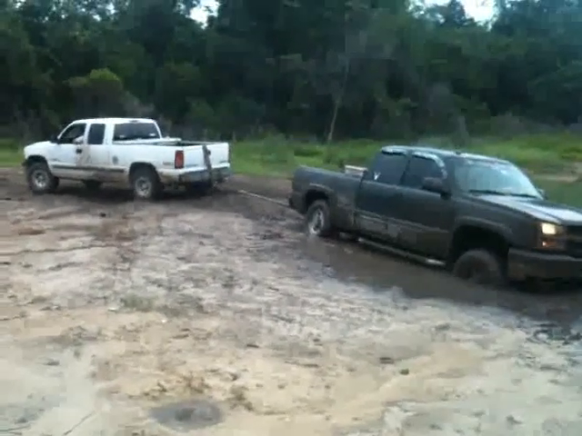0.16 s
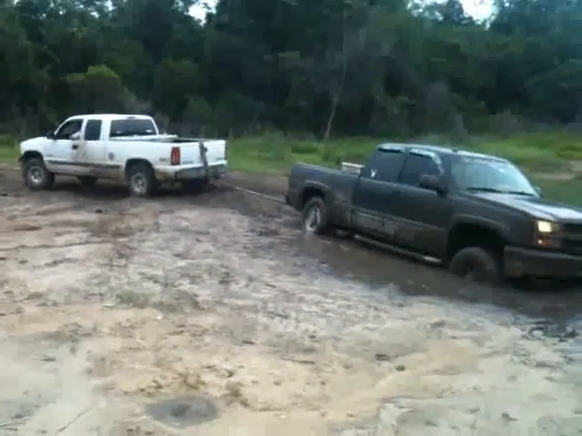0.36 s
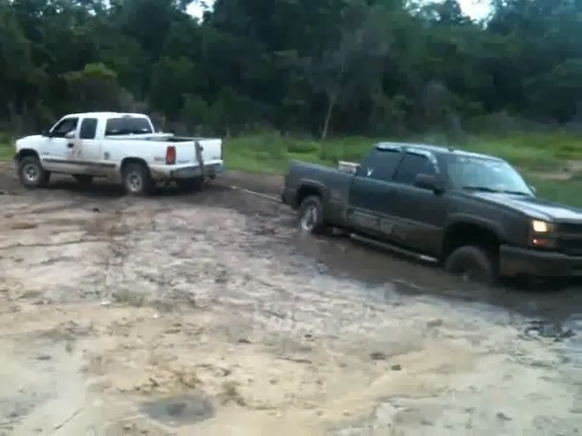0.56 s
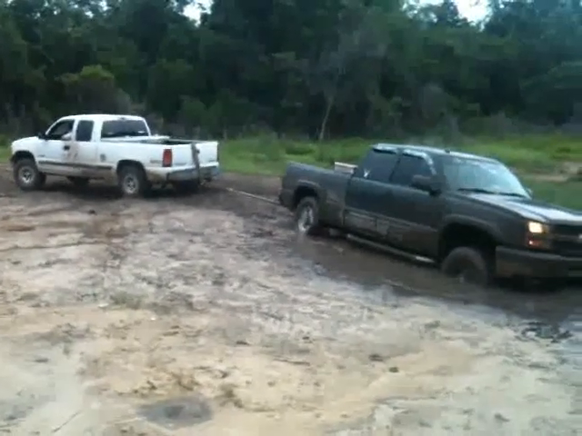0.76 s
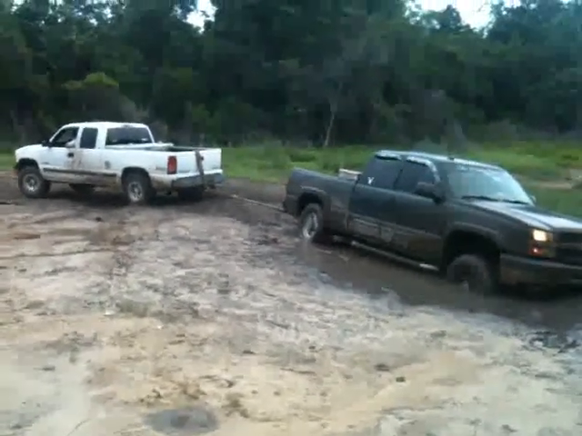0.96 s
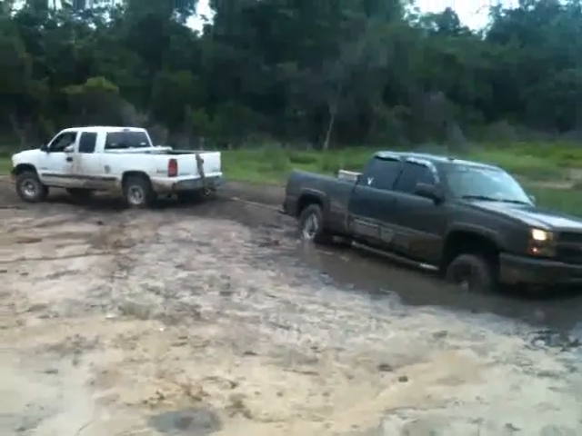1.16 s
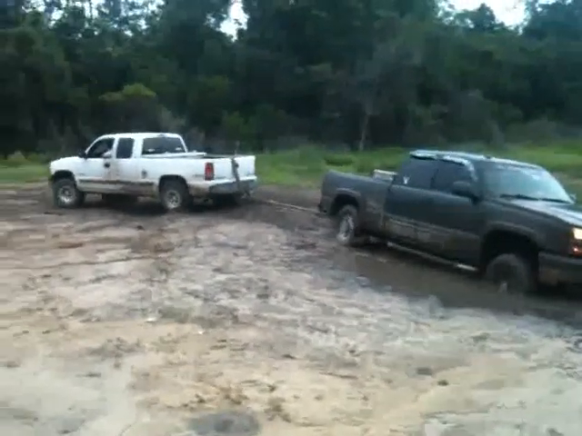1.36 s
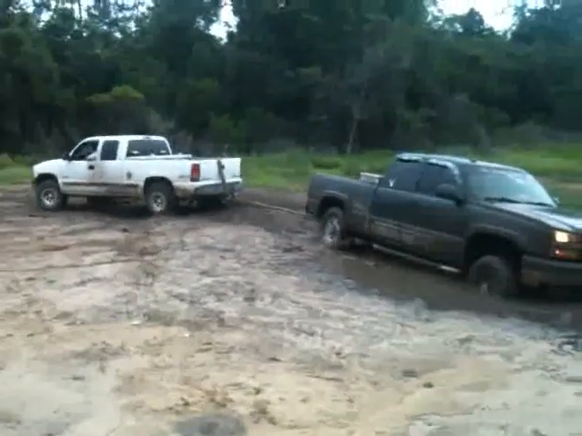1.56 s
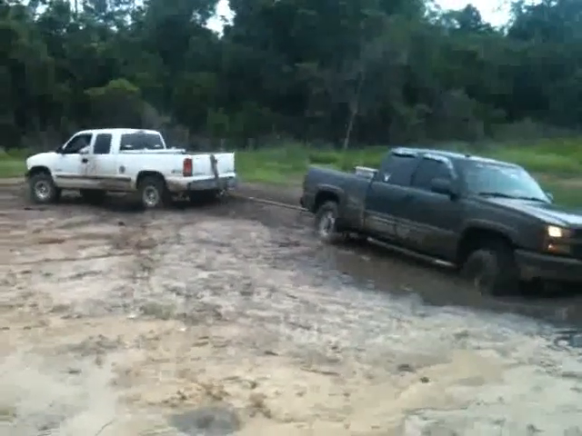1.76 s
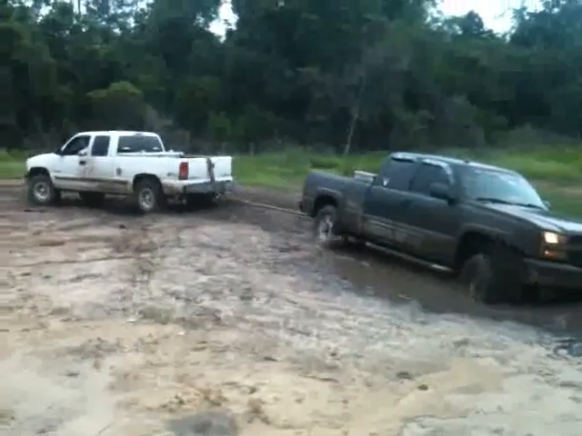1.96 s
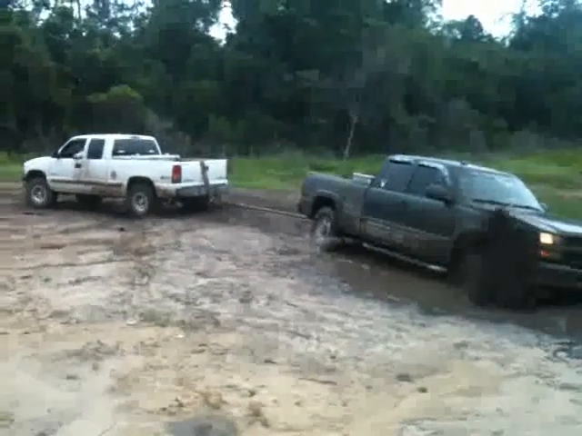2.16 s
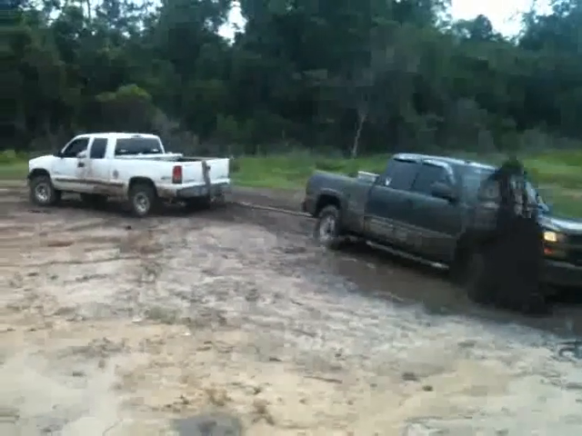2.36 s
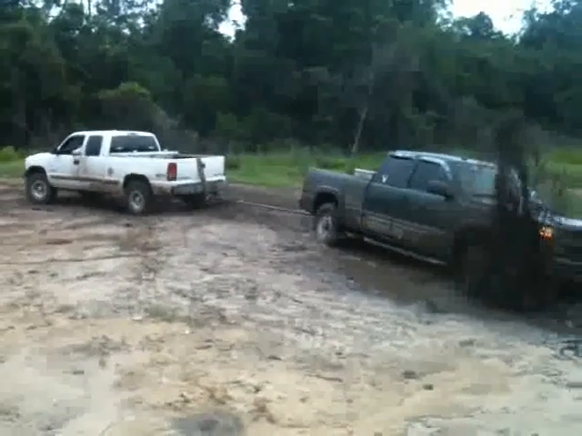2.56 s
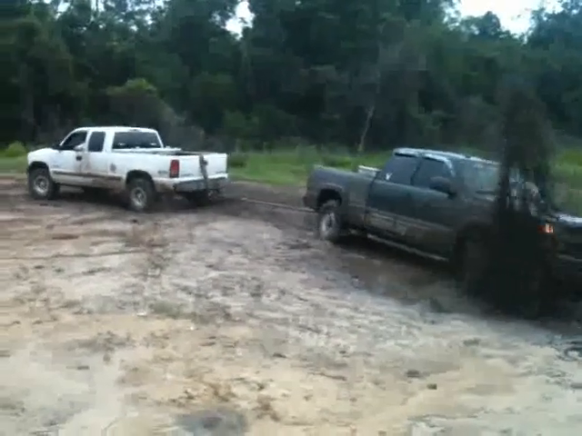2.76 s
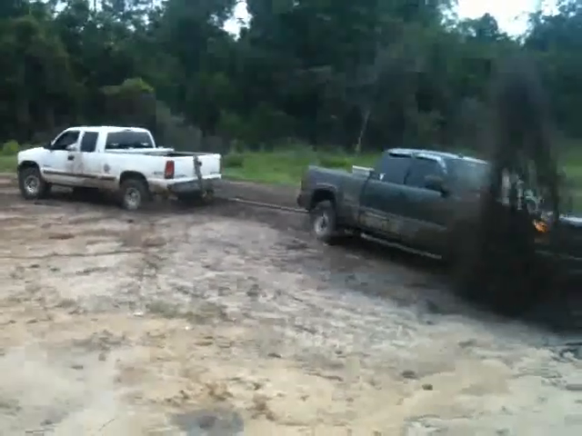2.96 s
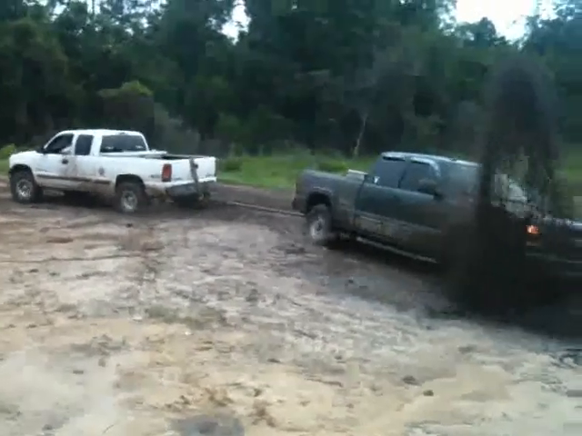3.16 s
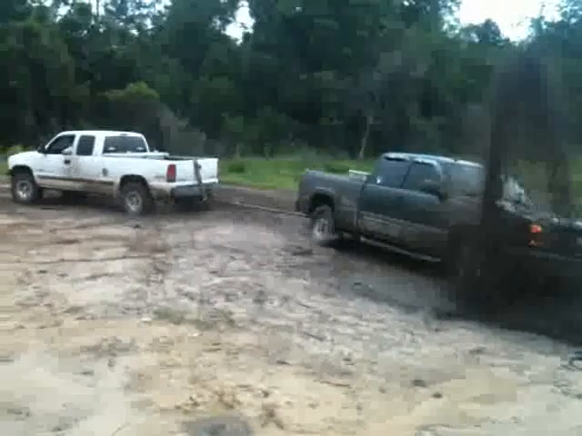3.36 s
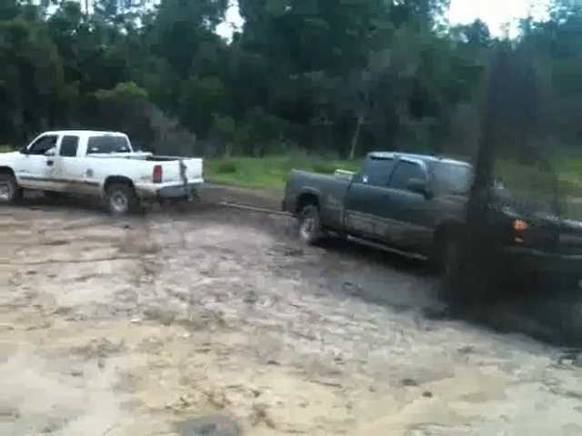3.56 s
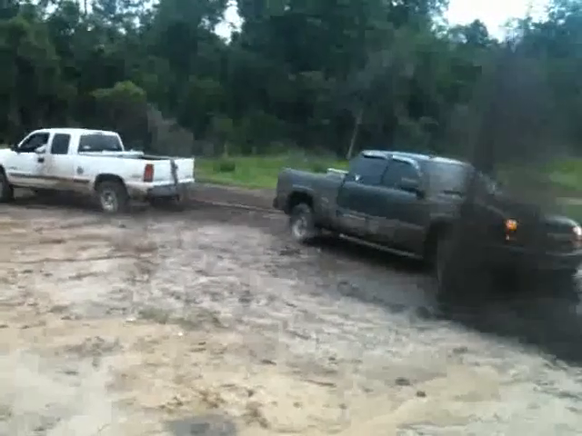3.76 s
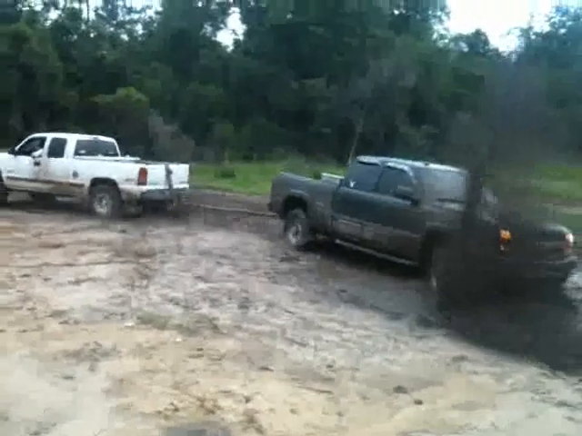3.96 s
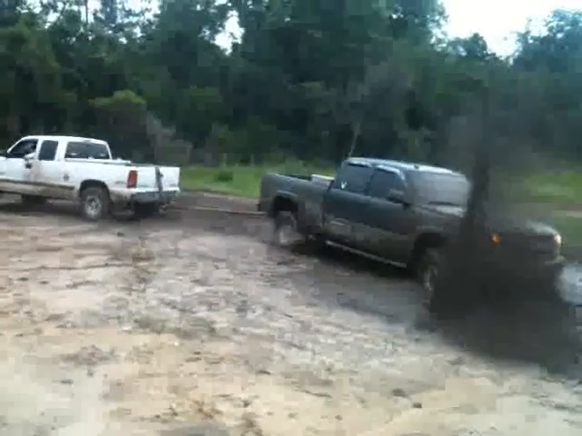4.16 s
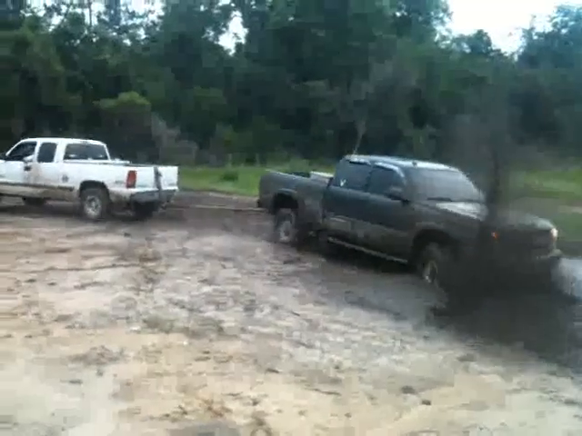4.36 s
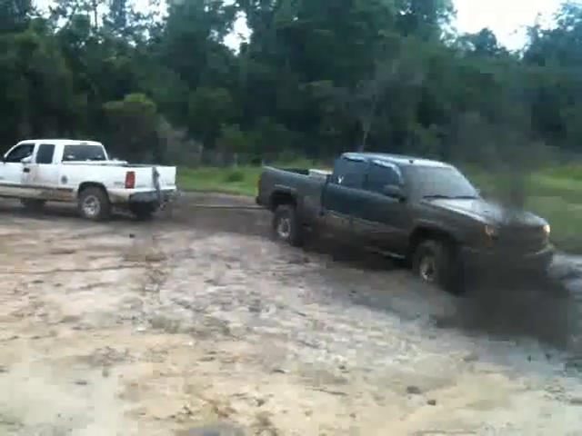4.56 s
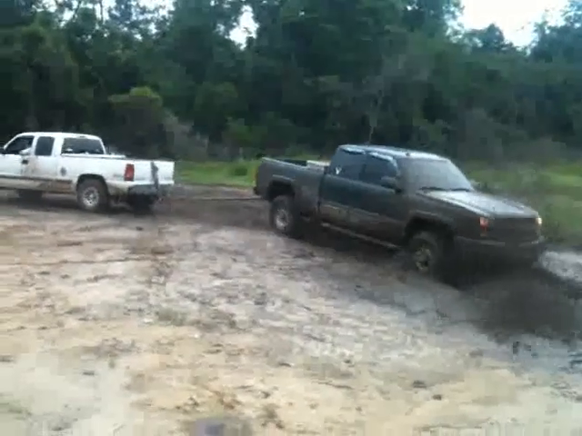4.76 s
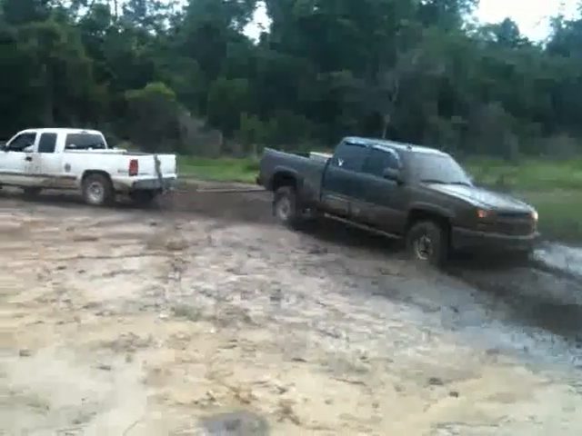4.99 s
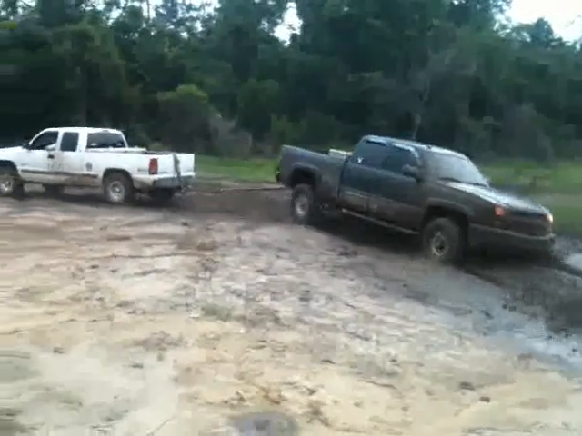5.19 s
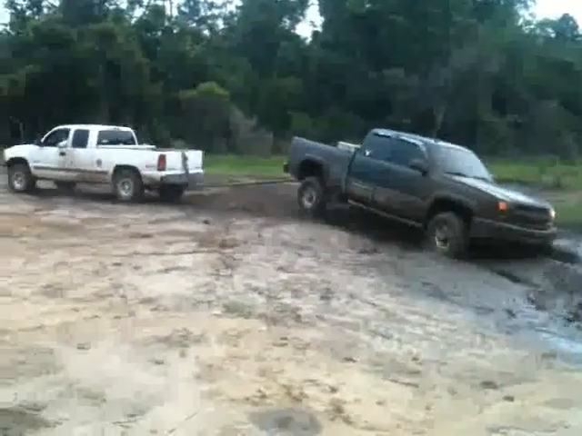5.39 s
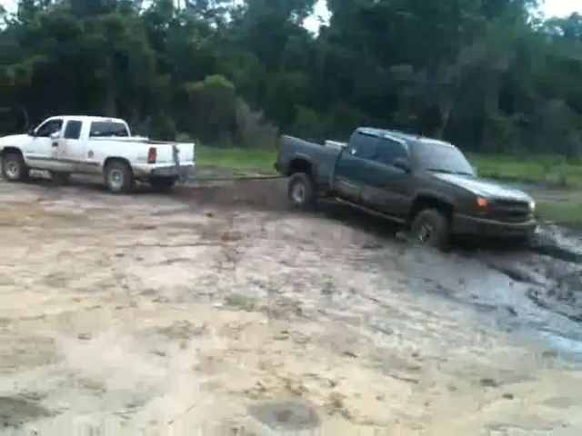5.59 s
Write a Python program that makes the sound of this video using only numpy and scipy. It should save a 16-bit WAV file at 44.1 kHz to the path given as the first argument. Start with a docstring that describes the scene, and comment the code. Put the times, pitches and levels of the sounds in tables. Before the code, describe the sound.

Two V8 pickups rumble low, then one pulls hard with sharp exhaust cracks while the other revs in raspy bursts, tyres spraying mud.

```python
"""Two V8 pickups at a mud hole, heard from the bank: at first both work lightly over still air.
The towing truck takes up the rope and pulls harder; loose metal rattles on it and exhaust cracks ring out.
The stuck truck joins in, its tyres throw a spray of mud, and it revs in bursts as the tow eases off.
Sine orders make each drone; uneven firing pulses make rumble, rasp and spitting gas in the pipes.
Filtered noise makes air and mud; the tree line echoes the exhausts faintly."""
import sys
import numpy as np
from scipy import signal
from scipy.fft import rfft, irfft
from scipy.io import wavfile
from scipy.ndimage import uniform_filter1d

SR = 44100
rng = np.random.default_rng(int(sys.argv[2]) if len(sys.argv) > 2 else 0)


def unload_audio(sound):
    """Save the sound as a 16-bit wav file, at the path given as the first command line argument."""
    columns = np.transpose(np.atleast_2d(sound))
    # keep every value between -1 and 1, then stretch to whole-number steps
    steps = np.round(np.clip(columns, -1, 1) * 32767)
    wavfile.write(sys.argv[1], SR, steps.astype(np.int16))


N = 248283  # samples

# Still air of the clearing. Each row: frequency in Hz, relative level in dB per Hz.
AIR_COLOUR = [(290, -68), (500, -9), (696, -4), (792, -2), (1430, -13.5), (1770, -14.5), (3430, -16.5),
              (12700, -18), (15500, -15)]
AIR_DB = -71
# Mud thrown by the spinning tyres. Each row: time in seconds, level in dB.
SPRAY_LEVEL = [(0, -77), (1.0, -78), (1.9, -62.5), (2.5, -60.5), (3.45, -59), (4.3, -59.5), (4.8, -63.5),
               (5.63, -71)]

# Thin metal rattle while the towing truck pulls.
RATTLE_START_S, RATTLE_HELD_S, RATTLE_DB = 0.88, 1.77, -70
RATTLE_ATTACK_S, RATTLE_RELEASE_S = 1, 0.19
# Its clearest ticks. Each row: time in seconds, starting level of the ring in dB, ring in Hz.
RATTLE_TICKS = [(1.2405, -63, 3250), (1.387, -63, 3620), (1.5413, -60, 3430), (1.7713, -56, 3470),
                (1.8237, -59, 3330), (1.8396, -55, 4200), (1.924, -58, 3920)]
TICK_RING_S, TICK_CONTACT_S, TICK_CONTACT_DB = 0.0036, 0.001, -2  # contact noise in dB re the ring

# Exhaust cracks. Each row: time in seconds, relative level in dB of snap, pipe pop, thud and high zing.
EXHAUST_CRACKS = [(1.240, -60, -39, -75, -81), (1.272, -47, -38.5, -74, -75),
                  (1.9726, -37, -30, -54.5, -65), (2.0213, -23.5, -25, -35, -42),
                  (2.0684, -22, -26, -36, -23.5), (2.242, -28.5, -35, -58, -62),
                  (3.727, -34, -27, -59, -65), (4.961, -53, -46, -66, -75)]
# Colour of the snap. Each row: frequency in Hz, relative level in dB per Hz.
SNAP_COLOUR = [(300, -1), (900, -17), (2000, -15), (4000, -4), (6000, -15.5), (10000, -9), (16000, -23)]

# Pipe under the rumble, tailpipe rasp (also the pop of a crack), and spitting gas (also the mud).
# Each row: frequency in Hz, relative level in dB per Hz.
PIPE_COLOUR = [(40, -27), (75, -19.5), (105, -3), (135, -4), (160, -5), (200, 1.5), (250, -2.5),
               (300, -3.5), (360, -3.5), (450, -16.5), (560, -26), (900, -73)]
RASP_COLOUR = [(300, -6), (480, 1.5), (570, -3), (660, 2.5), (745, 3), (805, 4), (870, 2), (1100, -2),
               (1230, -12), (1380, -19.5), (1600, -22), (1850, -15), (2300, -31), (4000, -26.5),
               (6000, -43.5)]
GAS_COLOUR = [(880, -40), (1500, -4), (1860, -4), (2330, -8.5), (2680, -7.5), (2930, -12.5), (3230, -6),
              (3740, -12.5), (4210, -8), (5880, -13.5), (6950, -9), (7970, -12), (10100, -11.5),
              (11400, -9), (15700, -7.5)]

# Engine orders before throttle and boom. Each row: multiple of the cycle rate, relative level in dB.
STUCK_TONES = [(3, -28.5), (4, -37.5), (5, -26.5), (6, -45.5), (7, -42), (8, -32.5), (9, -48), (10, -46),
               (11, -41.5), (12, -41.5), (13, -60), (19, -43), (20, -39), (21, -42), (23, -48.5),
               (24, -43.5), (25, -49.5), (27, -58), (29, -48), (32, -53.5)]
TOW_TONES = [(4, -52), (5, -31.5), (7, -37.5), (8, -36.5), (9, -27), (10, -42.5), (11, -36.5), (13, -43),
             (14, -33)]
# Exhaust resonances; an order booms as it glides through. Each row: frequency in Hz, gain in dB.
STUCK_RESONANCES = [(75, -35), (105, -13), (143, -11), (160, -6.5), (185, -2.5), (210, -3), (232, 0.5),
                    (295, 1.5), (330, -0.5), (370, 3), (410, -1), (450, 1), (510, -17.5), (620, -21),
                    (740, -6), (805, -16), (870, -10), (1000, -13), (1180, -14), (1300, -28)]
TOW_RESONANCES = [(60, -20), (108, -27), (124, -1.5), (150, -0.5), (172, -10.5), (190, 4.5), (230, 4),
                  (260, -6), (290, -23.5), (320, -10), (355, -4), (410, -14.5)]
# The eight firings of a cycle.
# Each row: relative strength in dB, delay through manifold and pipe in seconds.
STUCK_FIRINGS = [(1.5, 0.00047), (-11, 0.000036), (-7, 0.00211), (-4, 0.00022), (-13, 0.00083),
                 (-8.5, 0.00012), (-5, 0.00092), (-14.5, 0.0004)]
TOW_FIRINGS = [(1, 0.001136), (-8.5, 0.0015), (-7.5, 0.001575), (-5.5, 0.00055), (-6.5, 0.00197),
               (-2, 0.001856), (-2.5, 0.001), (-4, 0.00191)]

# Engine speed: the tow is one long pull that eases off; the stuck wheels slip and grip.
# Each row: time in seconds, engine cycles in Hz.
TOW_CYCLES = [(0, 12.75), (.8, 13.4), (1.1, 14.4), (1.55, 17.08), (1.8, 19.09), (2.05, 21.14),
              (2.35, 25.58), (2.6, 28.8), (2.86, 32.27), (3.03, 32.68), (3.14, 30.69), (3.25, 27.38),
              (3.5, 23.5), (3.8, 20.6), (3.95, 17.7), (4.6, 17), (5.05, 21.1), (5.63, 21.5)]
STUCK_CYCLES = [(0, 21.86), (.7, 23.7), (1.3, 26.92), (1.9, 28.26), (2.3, 26.97), (2.55, 25.47),
                (2.7, 28.18), (2.84, 30.09), (3.0, 28.85), (3.12, 30.71), (3.45, 36.2), (3.58, 37.7),
                (3.78, 34.46), (3.95, 36.53), (4.07, 37.39), (4.21, 36.19), (4.38, 39.01), (4.5, 38.98),
                (4.57, 34.71), (4.7, 33.4), (4.82, 27.48), (4.93, 27.14), (5.1, 29.28), (5.35, 24.71),
                (5.63, 21.5)]
# Effort of the tow, and of the stuck engine between stabs.
# Each row: time in seconds, effort in dB re full throttle.
TOW_THROTTLE = [(0, -60), (.7, -31), (1.12, -23.5), (1.25, -13.5), (1.7, -9), (1.91, -6.5), (2.0, -3),
                (2.3, 0.5), (2.48, -4), (2.8, -1.5), (2.92, -8), (3.4, -1), (3.72, -6), (4.0, -12),
                (4.8, -15.5), (5.25, -16), (5.45, -20.5), (5.63, -29)]
STUCK_PART_THROTTLE = [(0, -56), (1.1, -46), (2.3, -8.5), (2.9, -11), (3.7, -18), (4.15, -13), (4.45, -29),
                       (4.54, -25), (4.85, -27), (5.63, -38.5)]
# Stabs of the stuck truck's pedal.
# Each row: start in seconds, time to the release in seconds, effort in dB re full throttle.
PEDAL_STABS = [(2.54, 0.29, -3.5), (2.992, .57, -2.5), (3.77, 0.27, -2.5), (4.208, 0.2, -0.5),
               (4.599, 0.095, -12.5), (4.93, .13, -7.5)]
PEDAL_ATTACK_S, PEDAL_RELEASE_S = 0.045, 0.024
# Drive of the low drone. Each row: time in seconds, relative level in dB.
TOW_DRONE_LEVEL = [(0, -29.5), (.35, -23), (.7, -16.5), (1.1, -21.5), (1.25, -14.5), (1.7, -8), (1.9, -4),
                   (2.0, -3), (2.3, -3), (2.5, -6.5), (2.8, 0), (3.03, 6), (3.2, -6.5), (3.4, -7),
                   (3.72, -4.5), (4.0, -16.5), (4.8, -26), (5.15, -14), (5.45, -15.5), (5.63, -26)]
STUCK_DRONE_LEVEL = [(0, -24.5), (1.1, -36), (1.3, -19.5), (2.0, -4.5), (2.3, -3), (2.7, 2.5), (2.9, 0),
                     (3.2, -3.5), (3.55, 0), (3.7, -10.5), (3.85, -0.5), (4.05, 0), (4.17, -5), (4.3, 2),
                     (4.43, 0), (4.55, -10), (4.7, -5), (4.79, -13.5), (5.02, 0), (5.2, -11), (5.63, -15)]
# Growth with effort, one row each for rumble, rasp and gas.
# Each row: level at zero dB of effort in dB, growth in dB per dB of effort.
TOW_EXHAUST_GROWTH = [(-35.5, .44), (-43.5, 1.07), (-58, 5)]
STUCK_EXHAUST_GROWTH = [(-33, 0.38), (-42, 1), (-60, 1)]

# From the first to the second frequency in Hz the tones pass from drone level to throttle.
GROWL_RANGE_HZ = [310, 420]
GROWL_GROWTH = 0.64  # dB per dB of effort
FLUTTER_PER_S = 16  # each tone flutters a little in level
GAS_DB_PER_HZ, GAS_REF_HZ = 0.5, 27.3  # a faster engine spits more gas
SPIT_POWER = 1.24  # the strongest firings spit the most
LIGHT_THROTTLE_DB = -29.5  # effort at which the firings lose their edge
EVEN_FIRING_DB = -8.5  # effort above which the rumble stops growing
IDLE_WOBBLE_TURNS, IDLE_WOBBLE_PER_S = 0.005, 9  # the crank runs early and late on a light throttle


def undb(db):
    """Decibels to gain."""
    return np.exp(np.asarray(db) * (np.log(10) / 20))


def unit(x):
    """Scale to rms 1."""
    return x / np.sqrt(np.mean(x ** 2))


def curves(table):
    """The columns of a table after its times, sample by sample."""
    s, *columns = np.transpose(table)
    return [np.interp(np.arange(N) / SR, s, column) for column in columns]


def walk(rate):
    """Random levels held 1 / rate seconds, smoothed twice, at rms 1."""
    held = int(SR / rate)
    steps = np.repeat(rng.standard_normal(N // held + 1), held)
    smooth = uniform_filter1d(uniform_filter1d(steps, held), held)
    return unit(smooth[:N])


def colour(x, points, size=8192):
    """Minimum-phase filter through (Hz, dB) points: a pulse rings only after it strikes."""
    hz, db = np.transpose(points)
    bins = np.maximum(np.fft.rfftfreq(size, 1 / SR), 1)
    gain = undb(np.interp(np.log(bins), np.log(hz), db))
    # folding the cepstrum forward makes the filter causal
    cepstrum = irfft(np.log(gain))
    cepstrum[1:size // 2] *= 2
    cepstrum[size // 2 + 1:] = 0
    response = irfft(np.exp(rfft(cepstrum)))
    return signal.fftconvolve(x, response)[:N]


def band(x, lo_hz, hi_hz):
    """Band-pass between two frequencies."""
    sos = signal.butter(2, np.sort([lo_hz, hi_hz]), "band", fs=SR, output="sos")
    return signal.sosfilt(sos, x)


def fade(x, seconds):
    """Give every pulse an exponential tail."""
    return signal.lfilter([1], [1, -np.exp(-1 / (SR * seconds))], x)


def puffs(pulses, seconds):
    """A decaying burst of turbulent noise after each pulse."""
    return unit(fade(pulses, seconds) * rng.standard_normal(N))


def swell(start_s, held_s, attack_s, release_s):
    """An envelope that rises, holds until held_s after its start and dies away."""
    t = np.arange(N) / SR - start_s
    return np.clip(t / attack_s, 0, 1) * np.exp(-np.maximum(t - held_s, 0) / release_s)


def still_air():
    """The clearing behind the trucks: steady coloured noise."""
    return unit(colour(rng.standard_normal(N), AIR_COLOUR)) * undb(AIR_DB)


def scattered_echoes(x, t60_s, wet_db):
    """Many dull reflections in a decaying noise tail, as from the tree line or inside a silencer."""
    t = np.arange(SR // 2) / SR
    tail = rng.standard_normal(len(t)) * undb(-60 * t / t60_s) * (t > 0.012)
    dull = signal.butter(1, [400, 4000], "band", fs=SR, output="sos")
    tail = signal.sosfilt(dull, tail / np.linalg.norm(tail))
    return x + undb(wet_db) * signal.fftconvolve(x, tail)[:N]


def mud_spray(drops_per_s, spread_db):
    """Thrown mud lands as dense small splats: random drops of uneven size, each a burst of noise."""
    size_db = spread_db * np.minimum(rng.exponential(size=N), 5)
    drops = (rng.random(N) < drops_per_s / SR) * undb(size_db)
    splats = unit(colour(puffs(drops, seconds=0.017), GAS_COLOUR))
    return splats * undb(curves(SPRAY_LEVEL)[0])


def rattle(pulses):
    """Loose metal on the towing truck buzzes with the firings and now and then ticks clearly."""
    envelope = swell(RATTLE_START_S, RATTLE_HELD_S, RATTLE_ATTACK_S, RATTLE_RELEASE_S)
    buzz = unit(band(puffs(pulses, seconds=0.0031), 3300, 4140))
    out = buzz * envelope * undb(RATTLE_DB)
    t = np.arange(SR // 30) / SR
    for s, db, hz in RATTLE_TICKS:
        ring = np.sin(2 * np.pi * hz * t) * np.exp(-t / TICK_RING_S)
        contact = undb(TICK_CONTACT_DB) * rng.standard_normal(len(t)) * np.exp(-t / TICK_CONTACT_S)
        out[int(s * SR):][:len(t)] += undb(db) * (ring + contact)
    return out


def snap_burst(seconds):
    """A brief burst of gas with its spectrum flattened, so that it is about equal at every frequency."""
    t = np.arange(SR // 50) / SR
    spectrum = rfft(rng.standard_normal(len(t)) * np.exp(-t / seconds))
    return irfft(spectrum / np.abs(spectrum))[:len(t) // 2]


def exhaust_cracks():
    """Sharp reports of the exhaust: a snap of gas, a pop in the pipe, a low thud and a high zing."""
    strikes = np.zeros((4, N))
    for s, *levels_db in EXHAUST_CRACKS:
        strikes[:, int(s * SR)] = undb(levels_db)
    snap, pop, thud, zing = strikes
    snap = colour(signal.fftconvolve(snap, snap_burst(seconds=0.003))[:N], SNAP_COLOUR)
    pop = colour(pop, RASP_COLOUR)
    thud = band(fade(thud, seconds=0.0034), 27, 106)
    zing = band(fade(zing, seconds=0.0016) * rng.standard_normal(N), 13300, 14700)
    return undb(12.5) * snap + undb(25) * pop + undb(5) * thud + zing


def pedal():
    """Effort of the stuck engine in dB: stabs of the pedal on top of a part throttle."""
    effort = undb(curves(STUCK_PART_THROTTLE)[0])
    for s, held_s, db in PEDAL_STABS:
        effort = effort + undb(db) * swell(s, held_s, PEDAL_ATTACK_S, PEDAL_RELEASE_S)
    return 20 * np.log10(effort)


def drone(turns, hz, drone_db, effort_db, orders, boom, flutter_db):
    """Tones at multiples of the cycle rate: uneven banks give odd orders, high ones growl under load."""
    boom_hz, boom_db = np.transpose(boom)
    out = 0
    for multiple, db in orders:
        order = round(multiple)
        growl = np.interp(order * hz, GROWL_RANGE_HZ, [0, 1])
        drive_db = (1 - growl) * drone_db + growl * GROWL_GROWTH * effort_db
        resonance_db = np.interp(order * hz, boom_hz, boom_db)
        level_db = db + drive_db + resonance_db + flutter_db * walk(FLUTTER_PER_S)
        lag = order ** 2 / 10  # the pipe delays each order differently, which rounds the wave
        out = out - undb(level_db) * np.sin(2 * np.pi * order * turns + lag)
    return np.sqrt(2) * out


def firings(turns, cylinders, scatter_db, jitter_s):
    """Eight pulses a cycle at even power: their full strength, and their departure from the average."""
    count = len(cylinders)
    number = np.floor(count * turns).astype(int)
    at = np.flatnonzero(np.diff(number)) + 1
    strength_db, delay_s = np.array(cylinders)[number[at] % count].T
    chance = np.clip(rng.standard_normal((len(at), 3)), -2, 2)
    size = undb(strength_db + scatter_db * chance[:, 0])
    uneven = size - size.mean() + 0.29 * chance[:, 2]
    spacing = np.sqrt(np.gradient(at))  # sparser pulses are larger, which keeps the power even
    late = ((delay_s + jitter_s * chance[:, 1]) * SR).astype(int)
    at = np.clip(at + late, 0, N - 1)
    return unit(np.bincount(at, size * spacing, N)), unit(np.bincount(at, uneven * spacing, N))


def rumble(uneven, effort_db):
    """Uneven firings shake the low pipe resonances; on a light throttle the silencer blurs them."""
    hard = unit(colour(uneven, PIPE_COLOUR))
    soft = unit(band(scattered_echoes(hard, t60_s=0.12, wet_db=10.5), 135.6, 239))
    throttle = np.clip(1 - effort_db / LIGHT_THROTTLE_DB, 0.08, 0.85)
    return np.sqrt(throttle) * hard + np.sqrt(1 - throttle) * soft


def rasp(pulses, turbulence_db):
    """The steep front of each firing, with some turbulence behind it, rasps in the tailpipe."""
    turbulence = puffs(pulses, seconds=0.0071)
    return unit(colour(pulses + undb(turbulence_db) * turbulence, RASP_COLOUR))


def gas_spit(pulses, hz):
    """Each firing spits a burst of gas, stronger as the engine turns faster."""
    spit = unit(colour(puffs(pulses ** SPIT_POWER, seconds=0.0057), GAS_COLOUR))
    return spit * undb(GAS_DB_PER_HZ * (hz - GAS_REF_HZ))


def engine(speed, effort_db, drone_db, boom, growth, orders, cylinders,
           flutter_db, scatter_db, jitter_s, turbulence_db):
    """One V8 driven by speed and effort: its tones, its exhaust noise and its firing pulses."""
    hz, = curves(speed)
    idling = np.clip(effort_db / LIGHT_THROTTLE_DB, 0, 1) ** 2
    wobble = IDLE_WOBBLE_TURNS * idling * walk(IDLE_WOBBLE_PER_S)
    turns = np.cumsum(hz * (1 + 0.00078 * walk(20))) / SR + wobble  # engine cycles so far
    tones = drone(turns, hz, drone_db, effort_db, orders, boom, flutter_db)
    pulses, uneven = firings(turns, cylinders, scatter_db, jitter_s)

    (rumble_db, rumble_slope), (rasp_db, rasp_slope), (gas_db, gas_slope) = growth
    rumble_level = undb(rumble_db + rumble_slope * np.minimum(effort_db, EVEN_FIRING_DB))
    exhaust = rumble(uneven, effort_db) * rumble_level
    exhaust = exhaust + rasp(pulses, turbulence_db) * undb(rasp_db + rasp_slope * effort_db)
    exhaust = exhaust + gas_spit(pulses, hz) * undb(gas_db + gas_slope * effort_db)
    return tones, exhaust, pulses


def scene():
    """The bank of the mud hole: still air, spray, rattle and both engines, with the trees behind."""
    air = still_air()
    spray = mud_spray(drops_per_s=1100, spread_db=3.5)
    tow_tones, tow_exhaust, tow_pulses = engine(
        TOW_CYCLES, curves(TOW_THROTTLE)[0], curves(TOW_DRONE_LEVEL)[0], TOW_RESONANCES,
        TOW_EXHAUST_GROWTH, TOW_TONES, TOW_FIRINGS,
        flutter_db=1.0, scatter_db=2.1, jitter_s=0.00012, turbulence_db=-1.5)
    stuck_tones, stuck_exhaust, _ = engine(
        STUCK_CYCLES, pedal(), curves(STUCK_DRONE_LEVEL)[0], STUCK_RESONANCES,
        STUCK_EXHAUST_GROWTH, STUCK_TONES, STUCK_FIRINGS,
        flutter_db=0.9, scatter_db=1.3, jitter_s=0.00002, turbulence_db=-9.5)
    # only the exhausts and their cracks reach the tree line
    exhausts = scattered_echoes(stuck_exhaust + tow_exhaust + exhaust_cracks(), t60_s=0.29, wet_db=-12)
    mix = air + spray + rattle(tow_pulses) + tow_tones + stuck_tones + exhausts
    return mix[None]  # one microphone channel


def record(dry):
    """The microphone's recorder cuts the top steeply above 15.85 kHz."""
    low_pass = signal.ellip(10, 0.2, 70, 15850, fs=SR, output="sos")  # order, ripple dB, stop dB, Hz
    return signal.sosfilt(low_pass, dry)


dry = scene()
out = record(dry)
unload_audio(out)
```